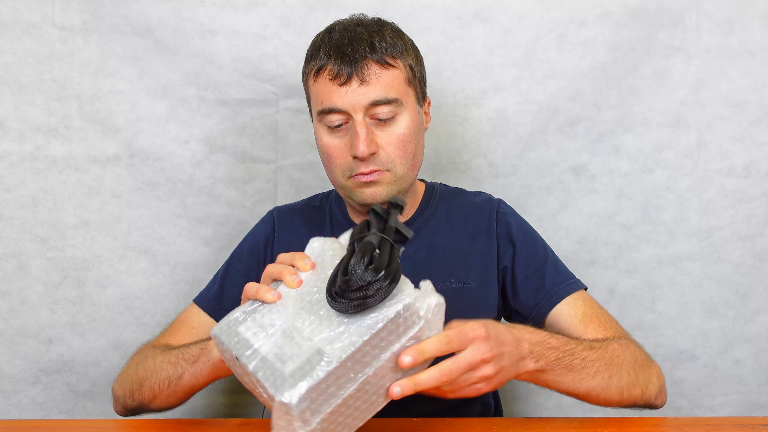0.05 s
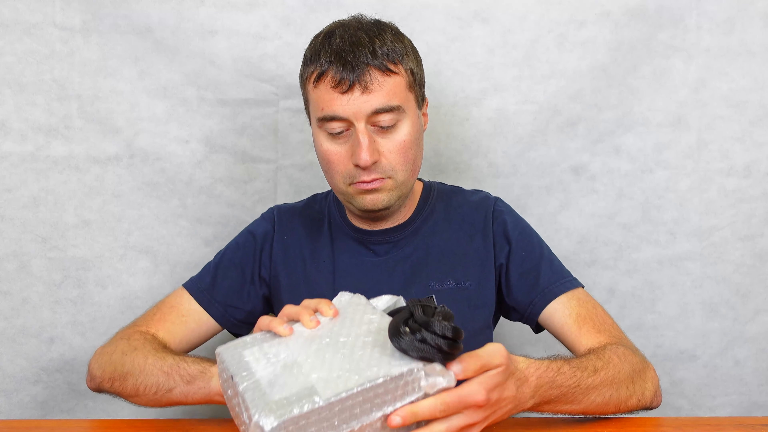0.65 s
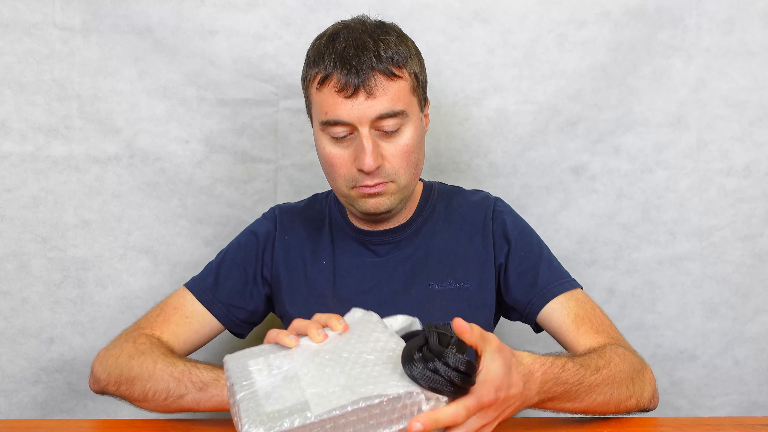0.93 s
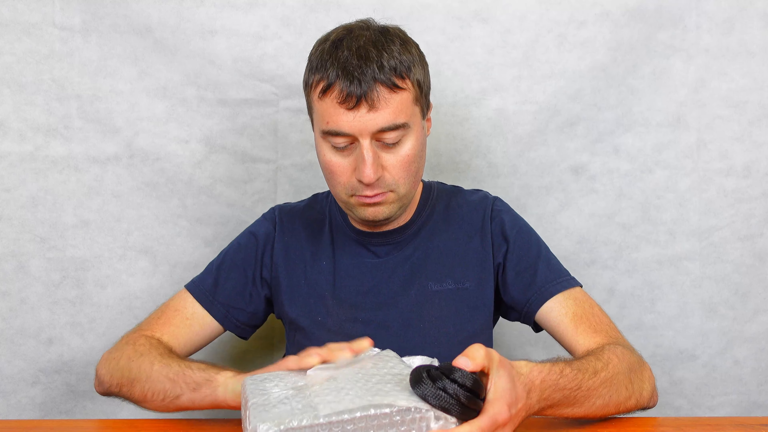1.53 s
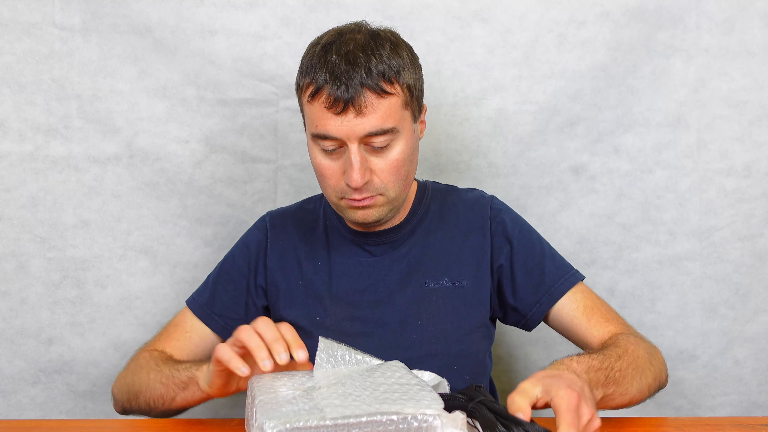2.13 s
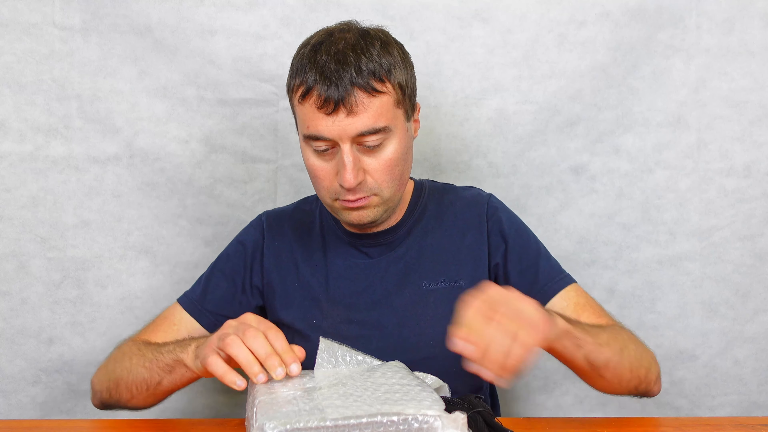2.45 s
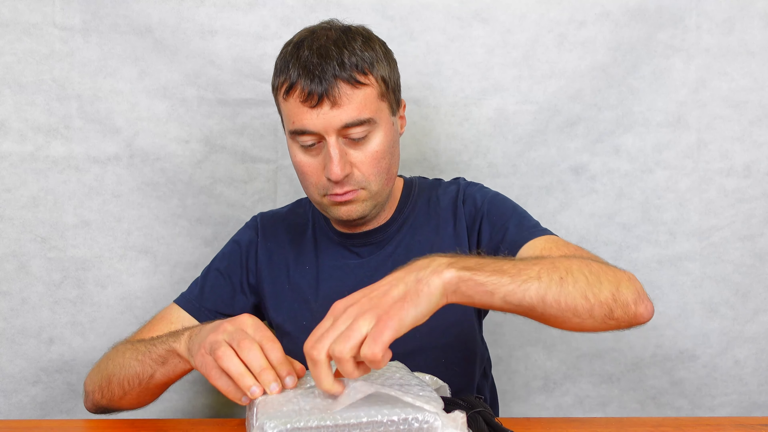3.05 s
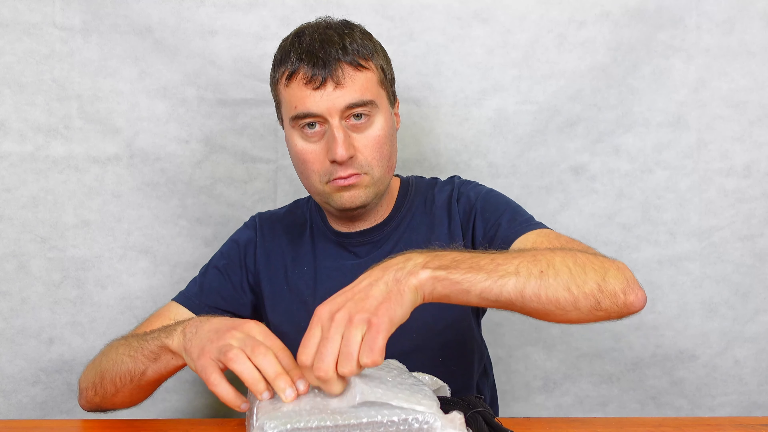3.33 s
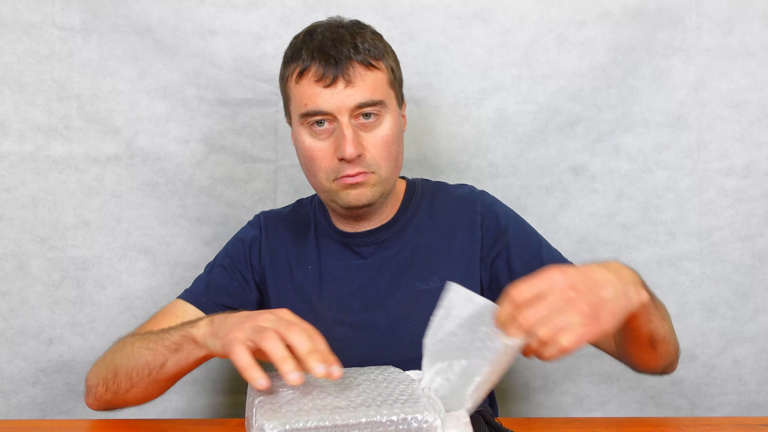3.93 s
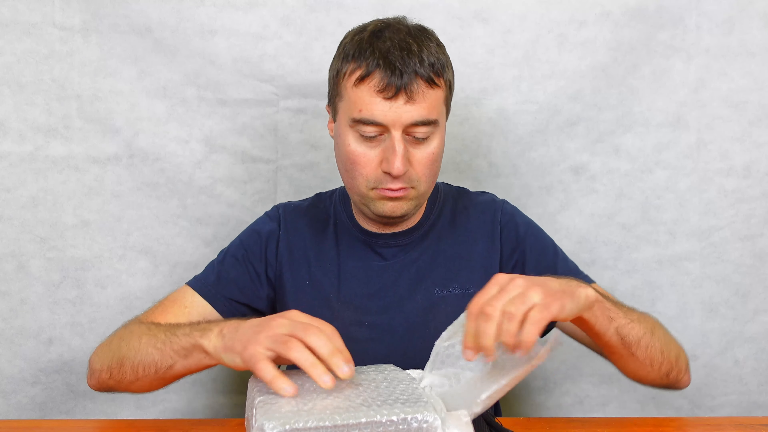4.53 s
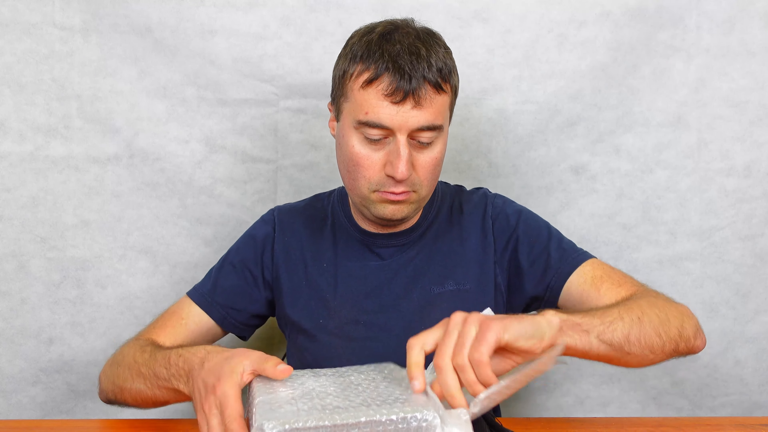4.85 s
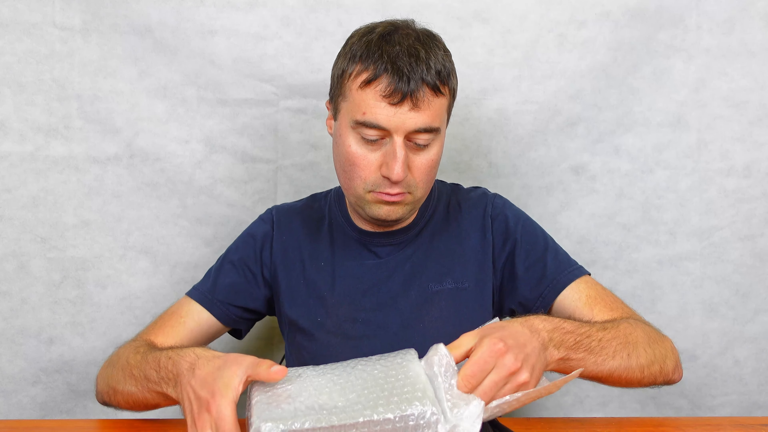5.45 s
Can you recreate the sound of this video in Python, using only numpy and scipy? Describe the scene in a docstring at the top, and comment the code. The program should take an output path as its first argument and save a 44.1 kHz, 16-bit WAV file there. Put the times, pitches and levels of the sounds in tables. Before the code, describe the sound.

Bubble wrap crinkles and rubs from the start as a wrapped box is turned in the hands, with a few sharp plastic snaps around 0.6 seconds. At about 0.8 seconds the box is set on a table with a dull knock and a low thud. Rustling continues, with another snap and softer bumps between 1.5 and 2 seconds. The handling then goes quieter, with only light ticks, and picks up again near 2.8 seconds. From about 3.3 to 3.6 seconds a stuck flap pulls free in a quick cluster of sharp snaps, the loudest moment, faintly ringing the hollow package. Crinkling carries on, with smaller snaps near 4.4 seconds, then grows fuller from 5 seconds, with a sharp crack and a light bump just after and one more snap near 5.7 seconds. Everything sounds close, in a small room with faint rumble and hum.

```python
"""A small room: a box in bubble wrap is turned over and set on a table, a coiled cable laid aside.
The film crinkles as tiny creases flip under the hands, and its air cells rub over each other.
Taut patches snap, loudest as a stuck flap is pulled free, and ring the hollow package.
The box knocks dully; the table top sways with a low note. Near walls reflect, over faint rumble and hum."""
import sys
import numpy as np
from scipy import signal
from scipy.fft import rfft, irfft
from scipy.io import wavfile
from scipy.ndimage import uniform_filter1d

SR = 44100
rng = np.random.default_rng(int(sys.argv[2]) if len(sys.argv) > 2 else 0)


def generate_wav(sig):
    """Save sig (samples, or channels by samples) to the path in sys.argv[1] as 16-bit PCM at SR."""
    pcm = np.round(np.clip(np.atleast_2d(sig).T, -1, 1) * 32767).astype(np.int16)
    wavfile.write(sys.argv[1], SR, pcm)


N = 250488

# film buckles or lets go: t/s, relative level/dB, f/Hz, cell pop/dB re film, crack/dB re film
SNAPS = [(0.0917, -20, 4400, -13, -11), (0.1602, -15.5, 3800, -12, -23), (0.1642, -16, 3880, -13, -18),
         (0.3028, -21.5, 4300, -23, -10), (0.4418, -21, 2820, -10, -17), (0.4666, -17, 3000, -5.5, -24),
         (0.5582, -24, 4540, -19, -12), (0.6018, -8, 4830, -13, -16), (0.6051, -7.5, 5160, -12.5, -16),
         (0.607, -10.5, 5100, -30, -22), (0.702, -6, 5140, -21, -22), (0.9044, -22, 3070, 0, -17),
         (1.05, -22.5, 2720, -9, -17), (1.0811, -24.5, 3050, 7, -10), (1.0908, -14, 2740, -2, -15),
         (1.5508, -20.5, 3630, -14, -9), (1.644, -9, 2850, -9, -21), (1.7928, -19, 5200, -6.5, -19),
         (2.047, -31, 4960, -11, -5), (2.1214, -27.5, 3950, -20, -16), (2.3172, -27, 6000, -18, -3),
         (2.544, -35, 3260, -20, -19), (2.6604, -28.5, 6140, -26, -6), (2.7682, -29, 5630, -21, -13),
         (3.099, -20, 3350, -7, -11), (3.3098, -2.5, 3600, -12, -14), (3.3689, -6.5, 4970, -35, -7),
         (3.37, -2, 3100, -18, -13), (3.376, -14.5, 4400, -9, -1), (3.3922, -7, 3500, -22, -20),
         (3.4116, 0, 3150, -33, -11), (3.4258, -2.5, 3800, -21, -5.5), (3.426, -7.5, 4040, -22, -12),
         (3.4519, 1.5, 3360, -18.5, -18), (3.4685, -1.5, 3460, -14.5, -10.5),
         (3.4724, -6, 3740, -10.5, -14), (3.5175, -21.5, 3400, -26, -16), (3.5861, -1, 3400, -22, -6.5),
         (3.591, 0.5, 3170, -16.5, -11), (3.8887, -22.5, 3120, -8, -8), (4.228, -21, 3400, -22, -27),
         (4.355, -15, 3360, -34, -16), (4.383, -12, 3340, -41, -24), (4.3916, -13.5, 3540, -22, -18),
         (4.484, -22, 3350, -9, -15), (4.57, -20, 3750, -15, -10), (5.1528, -6, 3230, -10, 0),
         (5.6581, -13.5, 3900, -13, -22)]
CRINKLE_REF_DB = -46  # reference for crease rate and tick level


def snaps(rows, gain_db=8.0, slap=0.17, flutter=0.91, flutter_t60_s=0.0053, width=1.25, count=8):
    """A taut patch lets go, slaps back a cycle later and flutters. One track per place on the wrap."""
    places, t = np.zeros((count, N)), np.arange(1024) / SR
    for k, (s, snap_db, hz, pop_db, crack_db) in enumerate(rows):
        release = signal.unit_impulse(len(t)) + slap * np.sinc((t - 1 / hz) * SR)
        kick = release + flutter * unit(rng.standard_normal(len(t)) * decay(t, flutter_t60_s))
        lower, overtone = (unit(band(kick, f / width, f * width, order=1)) for f in (hz, 1.83 * hz))
        film = unit(band(lower + from_db(-9) * overtone, 900, 6500, order=4))
        pop = from_db(pop_db) * unit(band(kick, 430, 1450))
        crack = from_db(crack_db) * unit(band(kick, 8850, 15500))
        add(places[k % count], s, from_db(snap_db + gain_db) * unit(film + pop + crack))
    return places


def ticks(film_db, per_s=14, centre_hz=4400, spread_oct=0.52, pop_db=-16.5, crack_db=-11):
    """Small random buckles, louder with the crinkle; rows as in SNAPS."""
    at = np.flatnonzero(rng.random(N) < per_s / SR)
    scatter, pitch = rng.standard_normal((N, 2))[at].T
    level_db = -27.5 + 0.7 * (film_db[at] - CRINKLE_REF_DB) + 0.5 * scatter
    hz = np.minimum(centre_hz * 2 ** (spread_oct * pitch), SR / 5)
    return [(s, db, f, pop_db, crack_db) for s, db, f in zip(at / SR, level_db, hz)]


def hand_effort(attack_s=0.01, attack_share=0.2, release_t60_s=0.2, hold_rub_db=-7):
    """Crinkle and rub curves in dB: strokes build, hold and fade on top of the resting grip."""
    # pushes, slides, pulls: t/s, length/s, crinkle/dB, rub/dB re crinkle
    strokes = [(0.069, 0.093, -41, -4.5), (0.264, .21, -45.5, -4), (0.557, 0.03, -57, 10.5),
               (0.684, 0.13, -45.5, -4), (0.929, 0.15, -48, -1.5), (1.208, 0.077, -48.5, -5),
               (1.386, 0.05, -43.5, -5), (1.551, 0.19, -48, 4), (1.691, 0.13, -43, 1.5),
               (1.874, 0.057, -43, 3), (2.111, 0.028, -53, 4.5), (2.269, 0.076, -58, 0.5),
               (2.45, 0.013, -57, 9.5), (2.502, 0.012, -60.5, -18), (2.642, 0.034, -53, -9),
               (2.762, 0.019, -53, -14), (2.803, 0.11, -43.5, -13), (2.967, 0.066, -46, -13),
               (3.065, .085, -51.5, -22), (3.18, .14, -44.5, -13), (3.596, 0.26, -55.5, -14),
               (3.864, 0.076, -45.5, -6), (3.985, 0.3, -48, -6.5), (4.337, 0.087, -46, -9.5),
               (4.522, 0.047, -44.5, -3), (4.802, .12, -50, -4), (4.899, .10, -46, -9.5),
               (4.978, 0.2, -40.5, -9), (5.06, .08, -44.5, 2), (5.197, 0.19, -42.5, -3.5),
               (5.377, 0.076, -54.5, -3), (5.542, .06, -48.5, -1.5), (5.627, 0.053, -40, -9.5)]
    # resting grip, let go halfway: t/s, crinkle/dB
    hold = [(0, -56.5), (.25, -48.5), (.55, -66.5), (.66, -53), (1.85, -53.5), (2.08, -58.5), (2.48, -63.5),
            (2.58, -88), (2.75, -70), (2.82, -57.5), (3.55, -52), (4.52, -53.5), (4.70, -59.5),
            (5.0, -47.5)]
    t = np.arange(N) / SR
    held = from_db(in_time(hold)[0])
    film_power, rub_power = held ** 2, (held * from_db(hold_rub_db)) ** 2
    for s, length_s, stroke_db, rub_db in strokes:
        rise = np.clip((t - s) / (attack_s + attack_share * length_s), 0, 1)
        fall_db = 60 * np.clip((t - s - length_s) / release_t60_s, 0, 2)
        stroke = rise * from_db(stroke_db - fall_db)
        film_power += stroke ** 2
        rub_power += (stroke * from_db(rub_db)) ** 2
    return 10 * np.log10(film_power), 10 * np.log10(rub_power)


def creases(per_s, spread_db, clump_db):
    """Tiny creases flip in random clumps; a few are far larger than the rest."""
    flips = rng.random(N) < per_s * from_db(clump_db * drift(90)) / SR
    sizes = from_db(spread_db * np.minimum(rng.exponential(1, N), 4.5))
    return flips * sizes * rng.choice([-1, 1], N)


def crinkle(film_db, rub_db, rasp_hz=3600, unsteady_db=1.16, patch_count=12):
    """Each crease clicks and rings its own patch of film; fast sliding merges the clicks to a swish."""
    # grip on the wrap: t/s, rubbed-cell f/Hz, taut rasp/dB re slack film
    grip = [(0, 700, -5), (1.3, 980, -10), (1.6, 600, -8), (2.2, 690, -5), (2.95, 880, 12), (3.28, 870, -1),
            (3.7, 930, -8), (5.68, 950, -6.5)]
    # slack film: f/Hz, level/dB
    film_spectrum = [(1000, -8), (1700, -5), (2300, -1), (3000, 0), (3800, 0.5), (4700, 1), (6200, 1),
                     (7500, -3.5), (10000, -26)]
    # fine sizzle: f/Hz, level/dB
    sizzle_spectrum = [(5500, -24), (7500, -1), (9000, 1.5), (13000, -0.5), (15500, 1), (17000, -23)]
    # rubbed air cells: f/Hz, level/dB
    rub_spectrum = [(60, -30), (140, -11.5), (260, -6.5), (400, 1.5), (650, -4.5), (1000, -2.5), (1300, -4),
                    (1800, -3.5), (2800, -36)]
    cell_hz, rasp_db = in_time(grip)
    per_s = 2300 * from_db(0.6 * (film_db - CRINKLE_REF_DB))  # harder work flips more creases
    clicks = evened(creases(per_s, spread_db=2.0, clump_db=3.5), size=6000)
    patch_of = rng.integers(0, patch_count, N)
    patches = sum(band(clicks * (patch_of == k), hz / 1.297, hz * 1.15)
                  for k, hz in enumerate(np.geomspace(2200, 12000, patch_count)))
    hiss = unit(rng.standard_normal(N))
    grains = unit(clicks) + from_db(-2) * unit(patches) + from_db(-18) * hiss
    slack = unit(colour(grains, film_spectrum))
    taut = unit(resonate(slack, np.full(N, rasp_hz), q=3.6))
    film = from_db(film_db - 1) * evened(slack + from_db(rasp_db) * taut)
    sizzle = from_db(film_db - 7.5) * evened(colour(grains, sizzle_spectrum))
    # cells bump over each other and sing at a pitch set by the grip
    slips = unit(clicks) + unit(creases(per_s / 2, spread_db=4.5, clump_db=6.0))
    bumps = unit(colour(slips, rub_spectrum))
    singing = unit(colour(resonate(slips, cell_hz, q=1.83), rub_spectrum))
    rub = from_db(rub_db - 3.5) * evened(bumps + from_db(3) * singing)
    return from_db(unsteady_db * drift(30)) * (rub + film + sizzle)


def hollow_ring(gain_db=-38, growth=1.74, flex=0.032):
    """Hard snaps ring the hollow package; it flexes in the hands, so its modes shift each time."""
    # package modes: f/Hz, level/dB, t60/s
    modes = [(340, -16, .12), (369.5, -4.5, 0.31), (416, -26, 0.098), (516, -3, 0.16), (944, 6, 0.072)]
    out, t = np.zeros(N), np.arange(16384) / SR
    hz, mode_db, t60_s = np.transpose(modes)[:, :, None]
    for s, snap_db, *_ in SNAPS:
        strength = from_db(growth * snap_db + gain_db + mode_db) * rng.choice([-1, 1], hz.shape)
        bent_hz = hz * (1 + flex * rng.standard_normal(hz.shape))
        add(out, s, np.sum(strength * decay(t, t60_s) * np.sin(2 * np.pi * bent_hz * t), axis=0))
    return out


def box_knocks(gain_db=21, push=0.37, rattle=0.91, rattle_t60_s=0.068):
    """Padded blows push and ring the box and rattle its contents; soft ones reach only low modes."""
    # box, cable and finger contacts: t/s, relative level/dB, cut-off/Hz
    contacts = [(.770, -15.5, 465), (0.782, -25, 600), (.795, -31.5, 1000), (0.835, -33.5, 645),
                (.933, -39, 337), (1.0904, -38, 2300), (1.5507, -33, 930), (1.61, -36.5, 2190),
                (1.645, -26.5, 1420), (1.907, -37, 1830), (1.915, -24.5, 1270), (2.2748, -36.5, 304),
                (4.245, -49, 397), (4.568, -40, 617), (4.868, -39.5, 860), (5.125, -36, 910),
                (5.608, -43.5, 1000)]
    # box on the table: f/Hz, level/dB, t60/s
    modes = [(88, -15, 0.31), (112, 7.5, 0.042), (167, -4, 0.056), (231, -0.5, 0.056), (346, -7.5, 0.17),
             (367, -1.5, 0.13), (527, -16, 0.04), (610, 6, 0.036), (847, 3, 0.055), (955, -13, .07),
             (1166, 8, 0.08), (1600, -25, 0.031)]
    out, t = np.zeros(N), np.arange(16384) / SR
    hz, mode_db, t60_s = np.transpose(modes)[:, :, None]
    shove = unit(band(signal.unit_impulse(len(t)), 150, 1130, order=1))
    for s, knock_db, cutoff_hz in contacts:
        strength = from_db(mode_db + rng.normal(0, 1, hz.shape))
        ring = np.sum(strength * np.cos(2 * np.pi * hz * t) * decay(t, t60_s), axis=0)
        contents = band(rng.standard_normal(len(t)), 134, 2150) * decay(t, rattle_t60_s)
        knock = band(push * shove + unit(ring) + rattle * unit(contents), cutoff_hz / 4.2, cutoff_hz)
        add(out, s, from_db(knock_db + gain_db) * unit(knock))
    return out


def table_sway(lowest_hz=48.2, upper_hz=79.7, upper_db=-16.5, upper_t60_s=0.4):
    """The table's two lowest modes swell under each load and die away."""
    # weight comes onto the top: t/s, level/dB, build-up/s, lowest-mode t60/s
    loads = [(0.772, -20, .006, 0.34), (1.423, -24, 0.014, 0.4), (1.752, -21.5, 0.029, 0.59),
             (2.278, -52, 0.012, 0.6), (2.672, -53, .02, 0.67), (3.40, -41.5, 0.057, .5),
             (4.08, -47, .02, 0.32), (4.399, -48, 0.022, 0.34)]
    out, t = np.zeros(N), np.arange(SR) / SR
    upper = from_db(upper_db) * decay(t, upper_t60_s) * np.sin(2 * np.pi * upper_hz * t)
    for s, level_db, build_s, t60_s in loads:
        lowest = decay(t, t60_s) * np.sin(2 * np.pi * lowest_hz * t)
        swell = 1 - np.exp(-t / build_s)
        add(out, s, -from_db(level_db) * swell * (lowest + upper))
    return out


def room(x, wet_db, first_wall_s=0.0018, size=16384):
    """Dense reflections off near walls for one source position; the bass lasts longest."""
    # room decay: f/Hz, t60/s
    decay_times = [(150, 0.34), (1000, 0.21), (3000, 0.21), (7000, 0.15), (15000, 0.19)]
    # colour of the reflections: f/Hz, level/dB
    spectrum = [(60, 0), (200, 4.5), (380, -5), (700, -2.5), (1500, 3), (2600, 1.5), (4200, -4.5),
                (5800, 1), (9000, -4.5), (15000, -3.5)]
    t, hz = np.arange(size) / SR, np.arange(size // 2 + 1) * SR / size
    white = rfft(rng.standard_normal(size))
    edges_hz = np.geomspace(40, SR / 2, num=10)
    tail = sum(irfft(white * (hz >= low) * (hz < high))
               * decay(t, at_hz(decay_times, np.sqrt(low * high)))
               for low, high in zip(edges_hz, edges_hz[1:]))
    onset = np.clip(t / first_wall_s - 0.5, 0, 1)
    response = colour(unit(tail * onset), spectrum)
    return from_db(wet_db) * signal.fftconvolve(x, response)[:N]


def room_floor(rumble_db=-64.5, hum_hz=53.2, hum_db=-73.5):
    """Faint rumble and a trace of mains hum."""
    # rumble: f/Hz, level/dB
    spectrum = [(25, -11), (48, -3), (62, -4), (150, -14.5), (400, -20), (800, -20), (1500, -22),
                (5000, -27.5), (16000, -44)]
    rumble = from_db(rumble_db) * np.sqrt(N) * unit(colour(rng.standard_normal(N), spectrum))
    hum = from_db(hum_db) * np.sqrt(2) * np.sin(2 * np.pi * hum_hz * np.arange(N) / SR)
    return rumble + hum


def from_db(db):
    """Decibels to gain."""
    return 10 ** (np.asarray(db) / 20)


def decay(t, t60_s):
    """Envelope falling 60 dB in t60_s."""
    return from_db(-60 * t / t60_s)


def unit(x):
    """Scale to energy 1."""
    return x / np.sqrt(np.sum(x ** 2) + 1e-20)


def evened(x, size=1500):
    """Hold the running rms at 1; single grains still vary."""
    power = uniform_filter1d(uniform_filter1d(x ** 2, size), size)
    return x / np.sqrt(np.maximum(power, 1e-20))


def at_hz(points, hz):
    """Read a table on a log-frequency axis."""
    freq, value = np.transpose(points)
    return np.interp(np.log(np.maximum(hz, 1)), np.log(freq), value)


def in_time(rows):
    """One curve per value column of a time table."""
    s, *columns = np.transpose(rows)
    return [np.interp(np.arange(N) / SR, s, column) for column in columns]


def band(x, low_hz, high_hz, order=2):
    """Causal band-pass."""
    sos = signal.butter(order, [low_hz, min(high_hz, SR / 2 - 100)], "band", fs=SR, output="sos")
    return signal.sosfilt(sos, x + 1e-18)


def colour(x, spectrum, size=4096):
    """Minimum-phase filter with the given spectrum."""
    hz = np.arange(size // 2 + 1) * SR / size
    cepstrum = irfft(np.log(from_db(at_hz(spectrum, hz))))
    cepstrum[1:size // 2] *= 2
    cepstrum[size // 2 + 1:] = 0
    return signal.fftconvolve(x, irfft(np.exp(rfft(cepstrum))))[:len(x)]


def resonate(x, hz, q, size=256):
    """Resonance following the curve hz, block by block."""
    out, state = np.zeros(N), np.zeros(2)
    for i in range(0, N, size):
        w = 2 * np.pi * hz[i] / SR
        r = np.exp(-w / (2 * q))
        b, a = np.array([1, 0, -1]) * np.sqrt(1 - r), [1, -2 * r * np.cos(w), r * r]
        out[i:i + size], state = signal.lfilter(b, a, x[i:i + size], zi=state)
    return out


def drift(per_s):
    """Smooth random curve, spread 1."""
    knots = rng.standard_normal(N // 20)
    wander = np.interp(np.arange(N) * per_s / SR, np.arange(len(knots)), knots)
    return wander / wander.std()


def add(out, s, sound):
    """Mix a sound in at s seconds."""
    start = max(round(s * SR), 0)
    out[start:start + len(sound)] += sound[:N - start]


def scene():
    """Wrap and box with their reflections, table sway and room floor; mono."""
    # snapping side faces the listener or the room: t/s, reflection gain/dB
    facing = [(.1, -7.5), (.65, -7), (1.1, -7), (1.65, -6.5), (3.45, -4.5), (4.38, -5.5), (5.2, -8.5)]
    facing_db, = in_time(facing)
    film_db, rub_db = hand_effort()
    wrap = crinkle(film_db, rub_db) + hollow_ring()
    box = box_knocks()
    mix = wrap + room(wrap, wet_db=-7.0) + box + room(box, wet_db=-7.5) + table_sway() + room_floor()
    snapped = sum(place + room(place, wet_db=facing_db) for place in snaps(SNAPS + ticks(film_db)))
    return (mix + snapped)[None]


def record(dry, cutoff_hz=16100):
    """Clip at full scale, then low-pass steeply."""
    lowpass = signal.ellip(10, 0.1, 80, cutoff_hz, fs=SR, output="sos")
    return signal.sosfilt(lowpass, np.clip(dry, -1, 1))


dry = scene()
out = record(dry)
generate_wav(out)
```